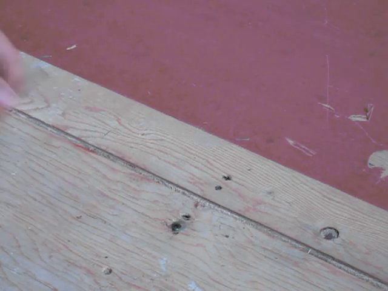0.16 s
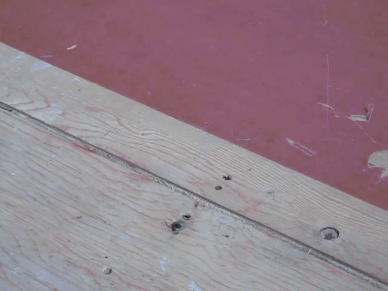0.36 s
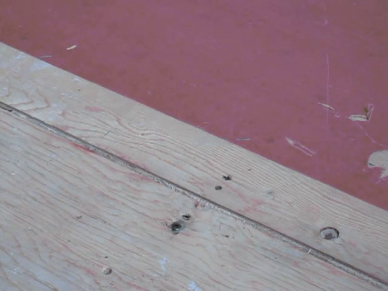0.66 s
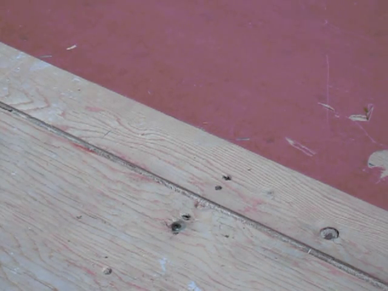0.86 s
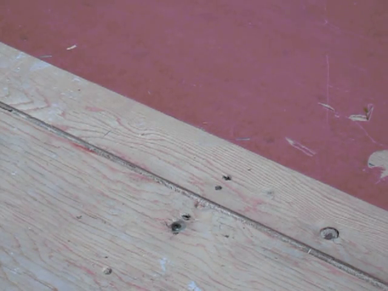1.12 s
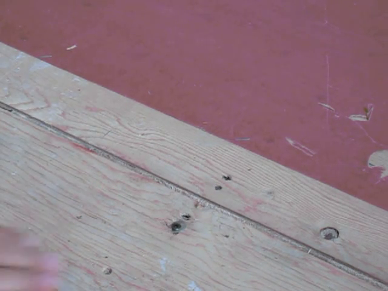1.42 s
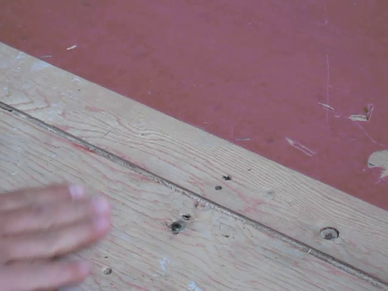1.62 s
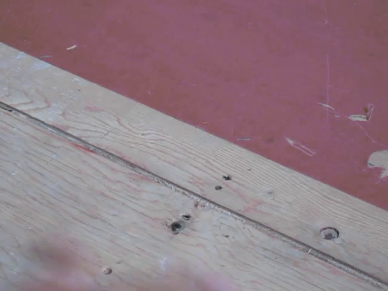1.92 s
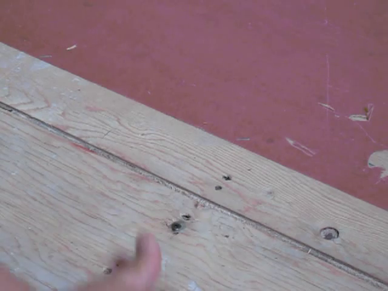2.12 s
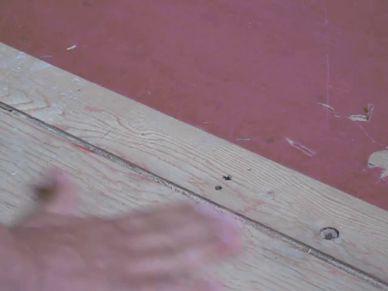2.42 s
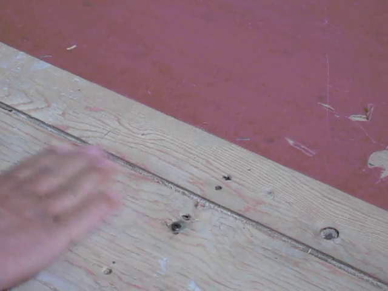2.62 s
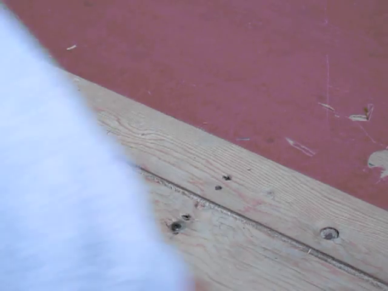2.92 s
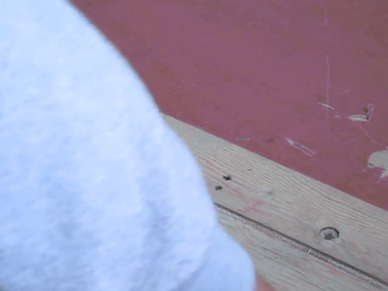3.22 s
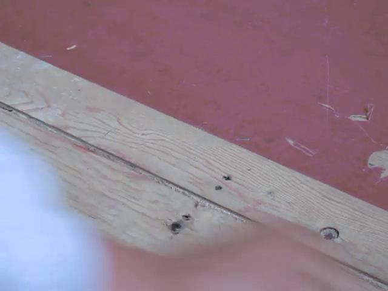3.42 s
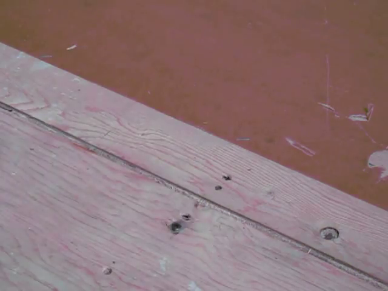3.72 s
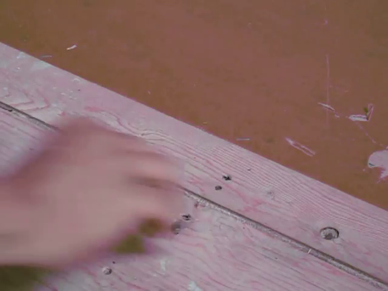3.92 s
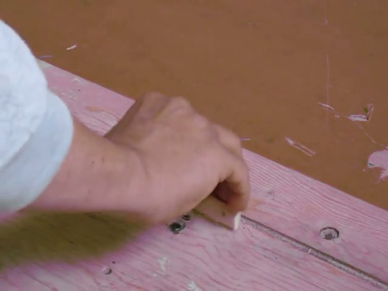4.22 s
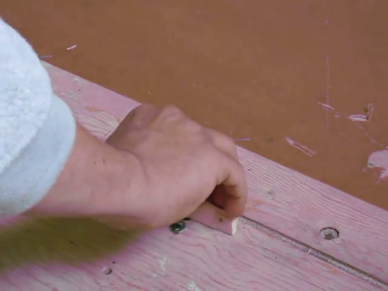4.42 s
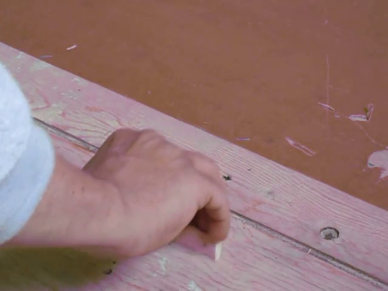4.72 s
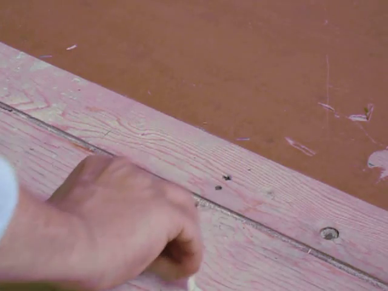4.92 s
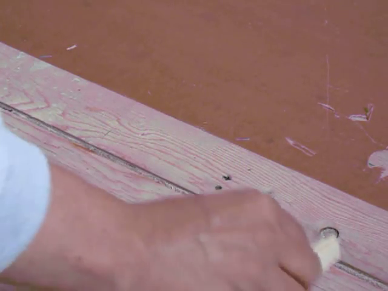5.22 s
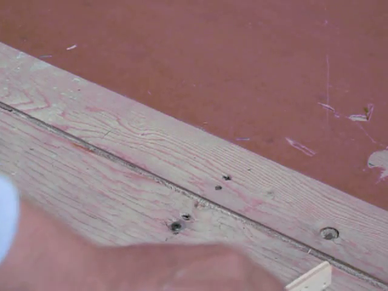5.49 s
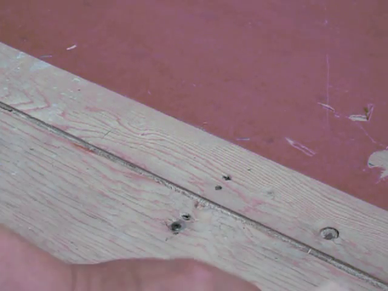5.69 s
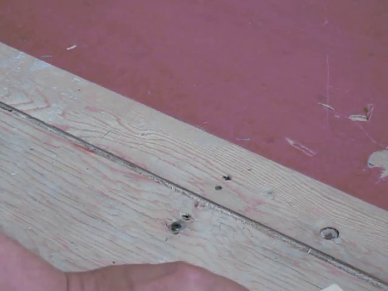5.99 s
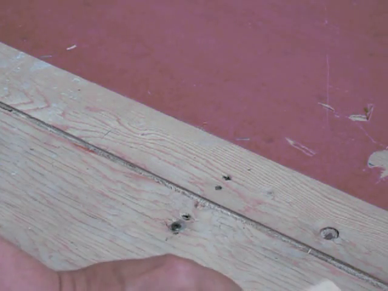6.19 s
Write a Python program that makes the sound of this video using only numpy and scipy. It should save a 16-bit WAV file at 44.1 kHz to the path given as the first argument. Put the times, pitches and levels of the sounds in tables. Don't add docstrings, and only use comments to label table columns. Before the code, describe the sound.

Quiet workshop interior, heard close to a bare plywood floor, with low room tone, faint fan whine and soft sleeve rustle throughout. At 1.1 s a light wooden offcut lands with a sharp bright double clack, slides and rattles, bouncing at 1.2 s and clicking weakly at 1.4. From 1.8 to 2.0 a palm rubs with a short breathy, slightly hollow swish; softer dusty sweeps follow at 2.3 to 2.8. At 3.1 fingers touch down, nails scrabble at 3.2 with crisp snaps and a knock, and a tiny high click comes at 3.4. Small gritty ticks at 4.3 to 4.4 grow into an uneven, catching wood scrape, strongest from 4.7 to 5.0, with dry snaps. At 5.4 the block falls flat with a resonant woody knock; at 5.8 a softer, duller set-down. Faint small clicks and cloth rustle end it, with subdued floor boom beneath.

```python
import sys
import numpy as np
from scipy import signal
from scipy.fft import rfft, irfft
from scipy.io import wavfile
from scipy.ndimage import uniform_filter1d

SR = 44100
rng = np.random.default_rng(int(sys.argv[2]) if len(sys.argv) > 2 else 0)


def wav_out(sig):
    wavfile.write(sys.argv[1], SR, np.round(np.clip(np.atleast_2d(sig).T, -1, 1) * 32767).astype(np.int16))


def convert_level_to_amplitude(level_db):
    exponent = np.asarray(level_db, float) / 20
    return 10 ** exponent


N = 280035

# f/Hz, level/dB
AIR = [(15, -42), (25, -3), (71, -4), (161, -2.5), (201, -4.5), (264, -6), (311, -4.5), (569, -11.5),
       (689, -12.5), (790, -11.5), (1070, -27), (2500, -3.5), (3110, -15.5), (10100, -16), (17500, -64)]
# f/Hz, width/Hz, level/dB
FAN = [(2160, 31, -59), (2438, 11, -61.5), (2530, 20, -65), (2630, 130, -68), (2000, 190, -79)]
# f/Hz, level/dB
SLEEVE = [(120, -61), (200, -2), (459, 12.5), (770, 6), (1290, 1.5), (1500, -4.5), (2250, -1),
          (4970, -15.5), (6800, -20), (12300, -21), (16500, -44)]
# f/Hz, level/dB
OFFCUT = [(120, -59), (200, -35), (375, -0.5), (606, -7.5), (1290, -0.5), (2860, 1.5), (3910, -4),
          (9660, -10), (13000, -18.5), (16500, -48)]
# f/Hz, level/dB
BOUNCE = [(120, -52), (200, -23), (503, -12), (756, -17), (1080, 2), (1450, -9), (2010, -0.5), (2250, -11),
          (2960, -5), (3560, -12), (9310, -15), (16500, -25)]
# f/Hz, level/dB
PALM = [(120, -63), (200, -38), (223, -53), (368, -7), (403, -15), (459, -9), (979, -11), (3500, -6.5),
        (6000, -10.5), (11800, -9.5), (14500, -22), (16500, -36)]
# f/Hz, level/dB
SWEEP = [(120, -59), (200, -37), (323, -24), (468, -16), (700, -19.5), (926, -10), (1470, -10.5), (2700, 0),
         (5500, -6), (11500, -7.5), (14500, -21), (16500, -36)]
# f/Hz, level/dB
NAILS = [(120, -53), (200, -9), (368, 8.5), (652, -8), (1110, 5), (1360, -14), (1970, -3), (2650, -11),
         (3560, -3), (4400, -22), (5550, -9.5), (7600, -12.5), (10000, -10.5), (13000, -19), (16500, -38)]
# f/Hz, level/dB
TAP = [(120, -56), (200, -25), (282, 0), (329, -47), (364, 7), (410, 3), (450, 12), (510, 3), (800, -13.5),
       (1050, -10.5), (1300, -31.5), (1590, -19.5), (3000, -44), (12000, -50), (15600, -64), (22000, -120)]
# f/Hz, level/dB
BLOCK = [(120, -52), (200, -9.5), (279, -7), (323, -21), (361, 0), (459, -6), (770, -2.5), (1300, -2),
         (2200, -9), (3500, 1.5), (4450, -4.5), (6680, -2.5), (11200, -3.5), (14200, -15.5), (16500, -37)]
# f/Hz, level/dB
THUD = [(120, -70), (200, -55), (292, -5), (323, -11), (371, 1.5), (460, -2.5), (600, -12.5), (951, -8),
        (1300, -23), (1600, -29.5), (6590, -46), (12000, -52), (15600, -68), (22000, -120)]
# t/s, effort/dB
STIRRING = [(0, -5), (.54, 5), (.8, 0), (1.07, 2), (1.75, 2), (2.22, -1), (3.0, 1), (3.7, 3.5),
            (4.07, -4.5), (4.27, -2.5), (5.3, -3), (5.72, -0.5), (6.0, -3.5), (6.35, 5.5)]
# rest level/dB, share of effort/1
SLEEVE_LAYERS = [(-54.5, 0.29), (-59, 0.99), (-61, 0.78)]
# t/s, peak/dB, f/Hz, t60/s
JINGLES = [(.11, -52, 12300, .05), (.44, -50, 10200, .12), (.58, -58, 12600, .1), (1.407, -41, 1050, 0.3),
           (1.409, -38.5, 1160, 0.3), (1.74, -51, 11700, 0.14), (3.11, -49, 6700, .04),
           (3.408, -24, 6750, 0.054), (3.408, -28, 10000, 0.039), (3.586, -37, 6700, 0.059),
           (3.65, -56.5, 8600, .15), (3.697, -36, 6620, .04), (3.71, -41, 10300, .07),
           (3.735, -40.5, 6560, .07), (5.21, -40, 6700, 0.066), (5.42, -35, 8500, 0.049),
           (5.42, -40, 10500, .05), (5.577, -46, 14300, .03), (5.701, -42.5, 10150, 0.43),
           (5.728, -31, 6630, 0.072), (5.735, -33, 3150, 0.068), (5.74, -36, 14100, .04),
           (5.768, -46, 8300, .03), (6.1, -47, 12500, .15), (6.135, -41, 6630, .08), (6.19, -37, 6760, 0.3),
           (6.27, -40, 6870, 0.23)]
# t/s, peak/dB
CLATTER = [
    (1.0819, -2.5),
    (1.0904, -5.5),
    (1.104, -25),
    (1.1208, -27),
    (1.219, -16),
    (1.2317, -13.5),
]
# f/Hz, level/dB, t60/s
STRIP = [(908, -3, 0.073), (1140, -2, 0.066), (1290, -23, 0.13), (1270, 0.5, 0.067), (1750, -12, 0.26),
         (1666, 1.5, 0.097), (1850, -1, 0.11), (2270, -20, 0.096), (2800, 0, 0.06), (2880, 7.5, 0.15),
         (2880, -6, 0.15), (3390, -2, 0.066), (4490, -3, 0.058), (7600, -20, .05)]
# t/s, peak/dB, f/Hz, t60/s, broad crack share/1
CRACKS = [
    (1.0816, -4, 2900, .004, .5),
    (1.0816, -6, 4600, .004, .5),
    (1.4097, -15, 2900, .004, .5),
    (1.4097, -20, 1100, .012, .05),
    (1.4148, -20, 3800, .004, .5),
    (3.2416, -14, 1700, .006, .3),
    (5.3792, -14, 1900, .006, .03),
    (4.8546, -6, 4500, .003, 1.0),
    (5.3792, -11, 650, .007, .02),
    (5.7685, -24, 2300, .012, .2),
]
# t/s, peak/dB, f/Hz, t60/s
SNAPS = [(1.083, -1, 2800, 0.0013), (1.091, -10, 1660, 0.0053), (1.095, -3.5, 1680, 0.0039),
         (1.409, -34, 1090, .015), (3.2079, -10, 3370, 0.0028), (3.2254, -15, 3550, 0.0056),
         (3.261, -17, 2000, 0.0071), (3.268, -16, 3350, 0.0055), (3.2422, -13.5, 1860, 0.0081),
         (3.257, -13, 1920, 0.0068), (4.285, -27, 870, 0.0084), (4.55, -16, 3020, 0.004),
         (4.733, -11.5, 3550, 0.0073), (4.737, -9, 970, 0.0057), (4.8541, -7.5, 6600, 0.0076),
         (4.859, -11, 9600, .003), (4.9918, -7.5, 6160, 0.0023), (4.9952, -16, 3600, 0.0023),
         (4.9895, -15, 7050, .003), (5.3681, -17, 800, 0.0076), (5.379, -14, 860, 0.01),
         (5.7687, -18, 1270, 0.02), (5.77, -20, 1650, .02), (5.7599, -25.5, 560, 0.017),
         (5.783, -26, 1090, .012)]
# t/s, peak/dB, f/Hz
TICKS = [(1.0912, -12, 12000), (1.1208, -23, 13000), (1.138, -30, 13000), (1.1502, -29, 13500),
         (1.1669, -22, 12500), (1.1913, -30, 12500), (1.2262, -33, 12000), (1.2347, -31, 13000),
         (2.089, -41.5, 12000), (3.2072, -19, 10300), (3.2184, -24, 7000), (3.2428, -17, 6000),
         (3.2456, -26, 8050), (4.3777, -33, 12000), (4.4752, -32, 13000), (4.551, -31, 13000),
         (4.5902, -31, 13000), (4.7343, -32, 13000), (2.2734, -42, 3540), (3.1305, -32, 6660),
         (3.407, -28, 6800), (3.4126, -30, 6800), (4.298, -26.5, 9500), (4.371, -45, 4130),
         (4.4167, -22, 11400), (4.423, -22, 9400), (4.4518, -37, 5040), (4.4818, -33, 13500),
         (4.492, -22, 7040), (4.536, -26, 3540), (4.582, -21, 3520), (4.6335, -13, 3520),
         (4.8692, -14, 7350), (4.875, -10, 6000), (5.2057, -39, 10000), (5.271, -34.5, 10200),
         (5.6545, -37, 7570), (5.731, -28, 6590), (5.8844, -36, 6720)]
# spectrum, slip rate/(1/s), slip size spread/dB
KINDS = dict(cloth=(SLEEVE, 20000, .6), slide=(OFFCUT, 20000, 1.2), bounce=(BOUNCE, 20000, .8),
         skin=(PALM, 20000, 1.1), dust=(SWEEP, 20000, 1.3), pick=(NAILS, 16000, 1.1),
         scrape=(BLOCK, 14000, 1.2), settle=(THUD, 20000, .6), touch=(TAP, 20000, .8),
         brush=(SLEEVE, 20000, 1.0))
# start t/s, rise/s, hold/s, pressure/dB, brightness/dB
STROKES = dict( slide=[(1.082, 0.0032, 0.1, -28, 2.5), (1.198, 0.02, 0.012, -34, 4)],
           bounce=[(1.4095, 0.00068, 0.00088, -33.5, -3)], skin=[(1.8, 0.098, 0.068, -28, 0.5)],
           dust=[(2.271, 0.11, 0.25, -36, -0.5), (2.4, 0.036, .07, -41.5, 8.5),
           (2.705, 0.03, .04, -42, 4.5)], pick=[(3.168, 0.036, 0.081, -33.5, 1)],
           brush=[(3.275, 0.022, 0.034, -49.5, 6), (5.19, 0.023, .02, -73, 11),
           (5.4, 0.016, 0.129, -64.5, -1.5), (1.72, .03, 0.054, -69.5, 6.5), (6.11, 0.086, .2, -58.5, 0)],
           touch=[(3.108, .002, .005, -52.5, 3), (4.2835, 0.0018, 0.0034, -48, -6),
           (5.76, 0.02, 0.12, -39.5, -4.5)], scrape=[(3.404, 0.0023, 0.0053, -45, 1),
           (4.369, 0.0022, 0.011, -42.5, 3), (4.412, .22, 0.0056, -35, -1),
           (4.665, 0.07, 0.26, -31.5, -0.5)], settle=[(5.3686, 0.0024, 0.0069, -40.5, 8),
           (5.379, 0.0023, 0.051, -44, 6)])
# hiss/dB, board/dB, hiss gain/(dB/s of hold), board delay/rise
SHARES = dict(slide=(-6, 0.5, -30, -1.2), bounce=(-24, -16, 4, 3.5), skin=(-5.5, -10.5, -25, 0.36),
          dust=(-2.5, -2, 13, .8), pick=(-0.5, -8.5, -57, 0.7), brush=(10.9, 9, 7.2, 0.12),
          touch=(-10.5, -1, -62, -3.3), scrape=(-3.5, -5.5, 31.5, 0.26), settle=(-17.5, 18, .1, -2))
# swell power/1, sag/(dB/s), release/(dB/s), tail/dB
SHAPES = dict(slide=(3, 48, 280, -9), bounce=(11, 3, 406, -12.5), skin=(2, -53, 232, -45),
          dust=(0.69, -5.5, 327, -16), pick=(1.5, -10, 400, -28), brush=(2, -18, 397, -25),
          touch=(0.5, 93, 500, -9), scrape=(.5, 10, 389, -33), settle=(9, 117, 300, -11.5))
# t/s, gain/dB, width/s
GRIPS = [(1.092, 2.5, .004), (1.1, -6, .003), (1.135, 1.5, .01), (1.17, 1, .008), (1.195, -2, 0.0061),
         (1.29, -2, .03), (2.29, 2, 0.016), (3.195, -2, .006), (3.235, -4, .004), (3.32, 0, 0.0074),
         (5.41, -4, .005), (5.44, 1.5, .012), (5.83, 1.5, 0.012), (5.9, -0.5, 0.018), (1.85, 4.5, 0.022),
         (1.95, 1, .02), (2.48, -1, 0.022), (2.755, 1, 0.025), (3.2076, 0.5, 0.0022), (3.244, 7, 0.0034),
         (3.2575, 4, 0.0032), (3.36, -2, 0.015), (4.372, -1.5, 0.0032), (4.4, 0, 0.012),
         (4.427, 11, 0.0049), (4.44, 2, 0.0042), (4.456, 7, 0.0074), (4.4927, 3.5, 0.0038),
         (4.513, -2, 0.0054), (4.5418, 1.5, 0.0035), (4.5525, 0, 0.0025), (4.572, -3, 0.0048),
         (4.5826, 0, .003), (4.5918, 2, .002), (4.6136, 2.5, 0.0025), (4.6238, 3, .003),
         (4.6339, 2, 0.0034), (4.668, 0, .008), (4.7135, 1, 0.0026), (4.735, 3.5, 0.0023),
         (4.7814, 0.5, .004), (4.8371, -0.5, .005), (4.8739, -4, 0.0032), (4.9033, -0.5, .004),
         (4.9201, 3, 0.0045), (4.9577, 3, 0.0067), (4.994, 5.5, 0.0022)]
# start t/s, rise/s, hold/s, level/dB, tightest f/Hz
CUP = [
    (1.8, 0.077, 0.09, -23.5, 3200),
    (2.3, .17, .06, -26, 2800),
    (2.696, .055, 0.00518, -25.5, 3115),
]
# start t/s, rise/s, hold/s, level/dB
WEIGHT = [
    (2.2, .05, 0.08, -67),
    (3.05, 0.16, 0.022, -56),
    (4.246, 0.051, .02, -50),
    (4.463, 0.093, 0.25, -53.5),
    (4.75, 0.14, 0.038, -47.5),
    (5.3, 0.13, .05, -60),
    (6.0, 0.14, .02, -69),
]
# t/s, peak/dB
BLOWS = [
    (3.11, -25),
    (3.241, -18),
    (4.281, -38),
    (4.735, -37),
    (5.3685, -22),
    (5.3792, -4),
    (5.7602, -24),
    (5.7682, -21),
]
# f/Hz, level/dB, t60/s
BOARD = [(290, -26, .12), (372, 2, 0.42), (400, -27, 0.1), (452.5, 3, 0.3), (476.3, -4, 0.19),
         (556, -8, 0.21), (670, -13, 0.33), (860, -6, 0.22), (945, -9, 0.34), (1050, -10, 0.35),
         (1280, 4, 0.06), (1600, 0, 0.13), (2080, -18, 0.072), (2490, -40, .1)]

AIR_DB, MIC_HISS_DB, MIC_CUT_HZ = -54, -73, 17850
ROOM_T60_S, ROOM_DB, ROOM_CUT_HZ = 0.35, -8.5, 6200
TICK_T60_S, TICK_CRACK, SNAP_CRACK = 0.004, 0.9, 0.11
TAIL_DB_PER_S, BOARD_LINGERS = 59, 0.7
CUP_OPEN_HZ, CUP_WIDTH_HZ, CUP_FALL_DB_PER_S = 2600, 940, 200
JOIST_HZ, JOIST_WIDTH_HZ = 73, 25
WEIGHT_REST_DB, WEIGHT_FALL_DB_PER_S = -67, 190
SOFT_CONTACT_HZ = 1210


def rms_one(x):
    return x / np.sqrt(np.mean(x ** 2) + 1e-20)


def coloured(x, spectrum, mask=lambda hz: 1):
    hz = np.maximum(np.arange(len(x) // 2 + 1) * SR / len(x), 1)
    point_hz, point_db = np.transpose(spectrum)
    gain = convert_level_to_amplitude(np.interp(np.log(hz), np.log(point_hz), point_db)) * mask(hz)
    return rms_one(irfft(rfft(x) * gain, len(x)))


def drift(rate_hz, size):
    r = np.exp(-2 * np.pi * rate_hz / SR)
    settle = 8000
    noise = rng.standard_normal(size + settle)
    return rms_one(signal.lfilter([1], [1, -2 * r, r * r], noise[settle:]))


def ring(clicks, hz, t60_s):
    r = convert_level_to_amplitude(-60 / (t60_s * SR))
    w = 2 * np.pi * min(hz, 19000) / SR
    return signal.lfilter([0, np.sin(w)], [1, -2 * r * np.cos(w), r * r], clicks + 1e-18)


def resonant_noise(hz, width_hz):
    t60_s = np.log(1000) / (np.pi * width_hz)
    return rms_one(ring(rng.standard_normal(N), hz, t60_s))


def swell(t, rise_s, hold_s, power, sag_db, fall_db, tail_db=-90):
    rise = np.clip(t / max(rise_s, 0.001), 0, 1) ** power
    held = convert_level_to_amplitude(-sag_db * np.clip(t - rise_s, 0, max(hold_s, 0)))
    after_s = np.maximum(t - rise_s - hold_s, 0)
    release = convert_level_to_amplitude(-fall_db * after_s) + convert_level_to_amplitude(tail_db - TAIL_DB_PER_S * after_s)
    return rise * held * release


def patchy(x, patch_db):
    _, _, cells = signal.stft(x, SR, nperseg=256)
    chance = rng.standard_normal(cells.shape)
    chance = uniform_filter1d(chance, size=7, axis=0)
    chance = uniform_filter1d(chance, size=9, axis=1)
    _, y = signal.istft(cells * convert_level_to_amplitude(patch_db * rms_one(chance)), SR, nperseg=256)
    return y[:len(x)]


def friction(kind, gains):
    def low(hz):
        return 1 / (1 + (hz / 1500) ** 6)

    def mid(hz):
        return 1 / (1 + (hz / 5500) ** 6)

    masks = [lambda hz: np.sqrt(mid(hz) * (1 - low(hz))),
             lambda hz: np.sqrt(1 - mid(hz)),
             lambda hz: np.sqrt(low(hz))]
    size = len(gains[0])
    spectrum, slips_per_s, spread_db = KINDS[kind]
    slips = (rng.random(size) < slips_per_s / SR) * rng.standard_normal(size)
    slip_size_db = spread_db * np.minimum(rng.exponential(1, size), 5)
    slips = patchy(slips * convert_level_to_amplitude(slip_size_db), patch_db=2.0)
    out = np.zeros(size)
    for mask, gain in zip(masks, gains):
        out += gain * convert_level_to_amplitude(0.31 * drift(50, size)) * coloured(slips, spectrum, mask)
    return out


def air():
    whine = sum(convert_level_to_amplitude(level_db) * resonant_noise(hz, width_hz) for hz, width_hz, level_db in FAN)
    return convert_level_to_amplitude(AIR_DB) * coloured(rng.standard_normal(N), AIR) + whine


def sleeve():
    effort_db = np.interp(np.arange(N) / SR, *np.transpose(STIRRING))
    gains = [convert_level_to_amplitude(rest_db + share * effort_db) for rest_db, share in SLEEVE_LAYERS]
    return friction("cloth", gains)


def fastener():
    size = 8000
    out, t = np.zeros(N + size), np.arange(size) / SR
    attack = np.minimum(t / 0.0027, 1)
    for s, peak_db, hz, t60_s in JINGLES:
        detune = 1 + 0.0145 * rng.standard_normal(4)
        cluster = np.sin(2 * np.pi * hz * np.outer(detune, t)).mean(axis=0)
        start = int(s * SR)
        out[start:start + size] += convert_level_to_amplitude(peak_db - 60 * t / t60_s) * cluster * attack
    return out[:N]


def struck(events, modes, scatter_db, bright_hz):
    out = np.zeros(N)
    luck = rng.standard_normal((len(events), len(modes)))
    for k, (hz, level_db, t60_s) in enumerate(modes):
        clicks = np.zeros(N)
        dulling = 1 + (hz / bright_hz) ** 2
        for (s, peak_db), chance in zip(events, luck[:, k]):
            clicks[int(s * SR)] = convert_level_to_amplitude(peak_db + level_db + scatter_db * chance) / dulling
        out += (-1) ** k * ring(clicks, hz, t60_s)
    return out


def snaps():
    size = 2000
    out, t = np.zeros(N + size), np.arange(size) / SR
    events = [(*snap, SNAP_CRACK) for snap in SNAPS] + CRACKS
    events = events + [(*tick, TICK_T60_S, TICK_CRACK) for tick in TICKS]
    b, a = signal.butter(2, [2500, 10500], "band", fs=SR)
    cracks = signal.lfilter(b, a, rng.standard_normal((len(events), size)))
    for (s, peak_db, hz, t60_s, share), crack in zip(events, cracks):
        wave = np.sin(2 * np.pi * hz * t) + share * crack
        start = int(s * SR)
        out[start:start + size] += convert_level_to_amplitude(peak_db - 60 * t / t60_s) * wave
    return out[:N]


def rubbing():
    out = np.zeros(N + SR)
    for kind, rows in STROKES.items():
        hiss_db, board_db, gain_db, late = SHARES[kind]
        power, sag_db, fall_db, tail_db = SHAPES[kind]
        for s, rise_s, hold_s, level_db, bright_db in rows:
            size = 32768 if rise_s + hold_s > 0.15 else 16384
            t = np.arange(size) / SR
            t_board = t - np.clip(late, 0, 1) * rise_s
            scratch = swell(t, rise_s, hold_s, power, sag_db, fall_db, tail_db)
            hiss = swell(t, rise_s, hold_s, power, sag_db - gain_db, fall_db, tail_db)
            board = swell(t_board, rise_s, hold_s, power, sag_db, BOARD_LINGERS * fall_db, tail_db)
            gains = [scratch, convert_level_to_amplitude(hiss_db + bright_db) * hiss, convert_level_to_amplitude(board_db - bright_db) * board]
            start = int(s * SR)
            out[start:start + size] += convert_level_to_amplitude(level_db) * friction(kind, gains)
    return out[:N]


def grip():
    t = np.arange(0, N, 16) / SR
    db = np.zeros(len(t))
    for s, gain_db, width_s in GRIPS:
        db += gain_db * np.exp(-0.5 * ((t - s) / max(width_s, 0.001)) ** 2)
    return convert_level_to_amplitude(np.interp(np.arange(N) / SR, t, db))


def cupped_palm():
    t = np.arange(N) / SR
    hz, gain = np.full(N, float(CUP_OPEN_HZ)), np.zeros(N)
    for s, rise_s, hold_s, level_db, tight_hz in CUP:
        press = swell(t - s, rise_s, hold_s, 1.6, 0, CUP_FALL_DB_PER_S)
        hz += press * (tight_hz - CUP_OPEN_HZ)
        gain += press * convert_level_to_amplitude(level_db)
    phase = 2 * np.pi * np.cumsum(hz) / SR
    even, odd = drift(CUP_WIDTH_HZ, N), drift(CUP_WIDTH_HZ, N)
    flutter = convert_level_to_amplitude(-12.0 + 3.3 * drift(25, N))
    return gain * flutter * (even * np.cos(phase) + odd * np.sin(phase))


def joists():
    t = np.arange(N) / SR
    load = np.zeros(N)
    for s, rise_s, hold_s, level_db in WEIGHT:
        load += convert_level_to_amplitude(level_db) * swell(t - s, rise_s, hold_s, 2.1, 0, WEIGHT_FALL_DB_PER_S)
    boom = ring(resonant_noise(JOIST_HZ, JOIST_WIDTH_HZ), JOIST_HZ + 3, 0.07)
    return (convert_level_to_amplitude(WEIGHT_REST_DB) + load) * rms_one(boom)


def room(x):
    t = np.arange(int(0.8 * SR)) / SR
    tail = rng.standard_normal(len(t)) * convert_level_to_amplitude(-60 * t / ROOM_T60_S) * (t > 0.004)
    tail = signal.lfilter(*signal.butter(1, ROOM_CUT_HZ, fs=SR), tail)
    tail = tail / np.sqrt(np.sum(tail ** 2))
    return convert_level_to_amplitude(ROOM_DB) * signal.fftconvolve(x, tail)[:N]


def scene():
    offcut = convert_level_to_amplitude(-17.5) * struck(CLATTER, STRIP, scatter_db=1.0, bright_hz=np.inf)
    board = convert_level_to_amplitude(-22.0) * struck(BLOWS, BOARD, scatter_db=3.5, bright_hz=SOFT_CONTACT_HZ)
    hits = offcut + board + snaps() + fastener()
    rub = grip() * rubbing() + sleeve() + cupped_palm()
    near = hits + rub + room(hits + 0.5 * rub)
    no_bass = signal.butter(4, 260, "high", fs=SR, output="sos")
    return (signal.sosfilt(no_bass, near) + joists() + air())[None]


def low_pass(x):
    return signal.sosfilt(signal.butter(12, 17940, fs=SR, output="sos"), x)


def record(dry):
    hissing = dry + convert_level_to_amplitude(MIC_HISS_DB) * np.diff(rng.standard_normal(N + 1))
    top_cut = signal.cheby2(16, 80, MIC_CUT_HZ, fs=SR, output="sos")
    mix = signal.sosfilt(top_cut, hissing)
    return low_pass(mix)


dry = scene()
out = record(dry)
wav_out(out)
```